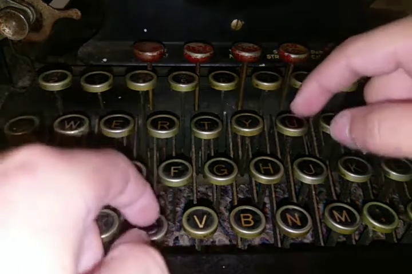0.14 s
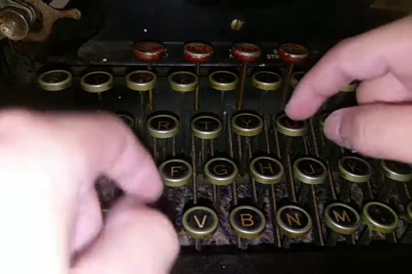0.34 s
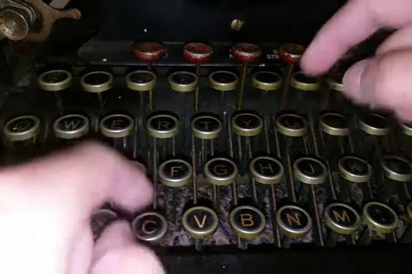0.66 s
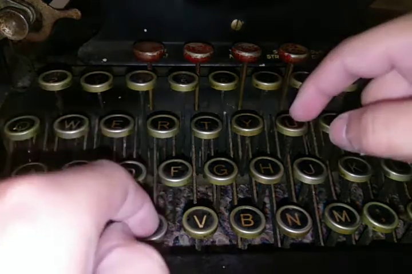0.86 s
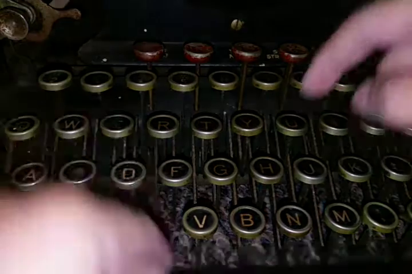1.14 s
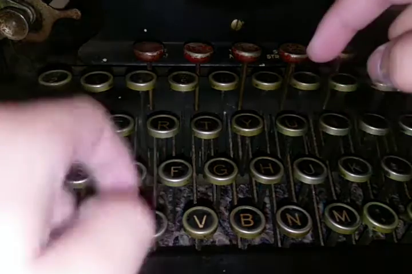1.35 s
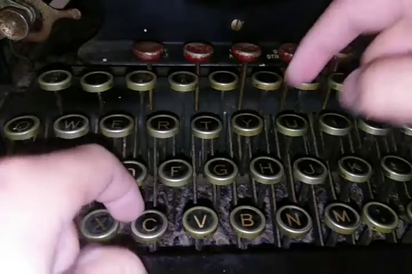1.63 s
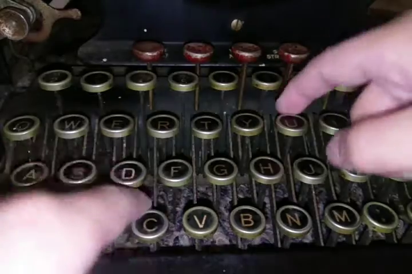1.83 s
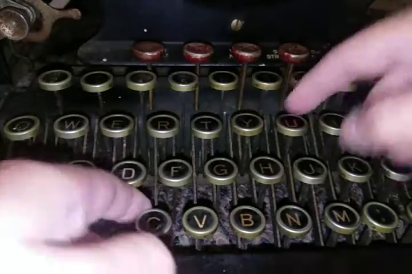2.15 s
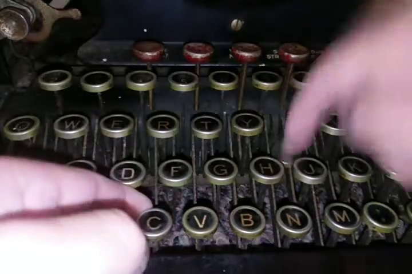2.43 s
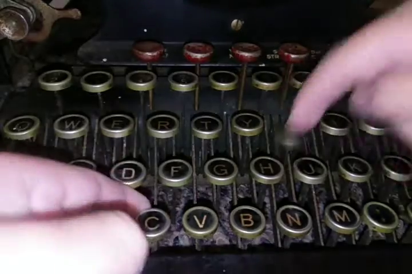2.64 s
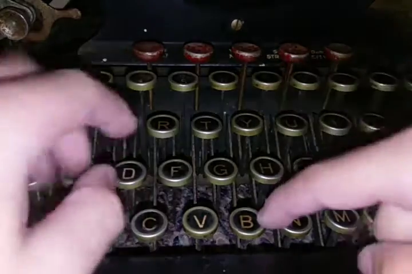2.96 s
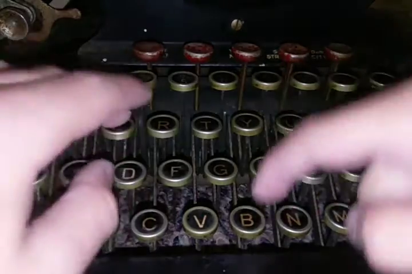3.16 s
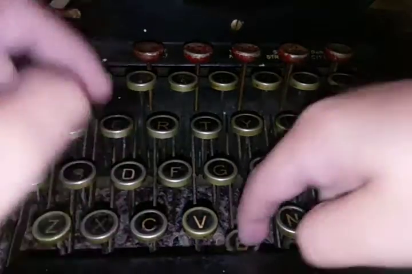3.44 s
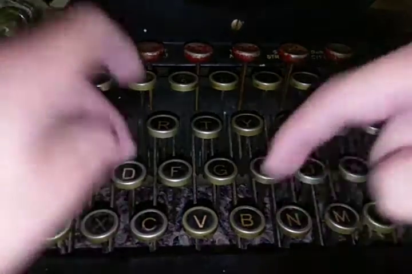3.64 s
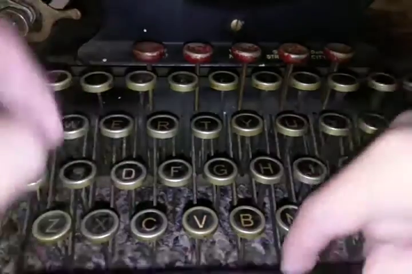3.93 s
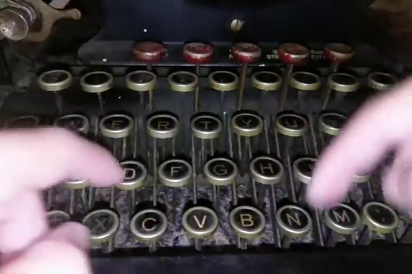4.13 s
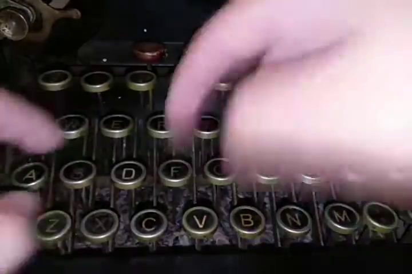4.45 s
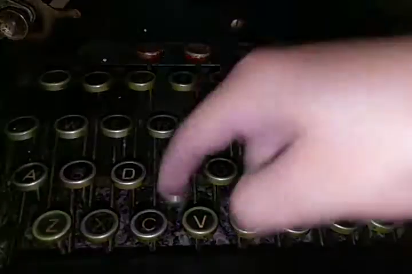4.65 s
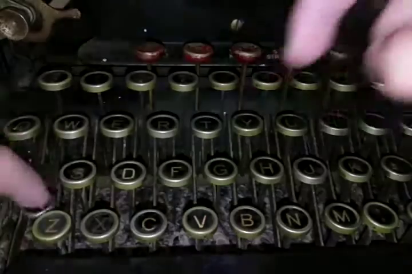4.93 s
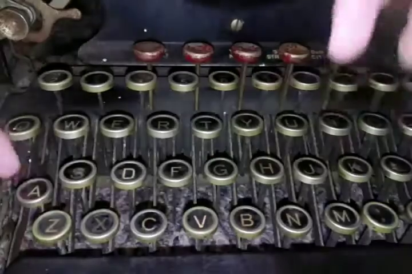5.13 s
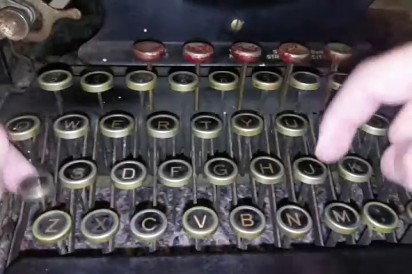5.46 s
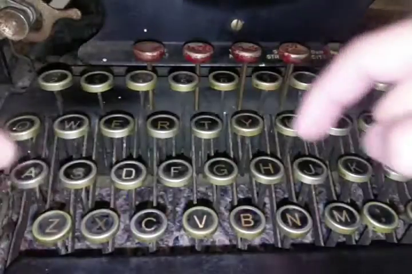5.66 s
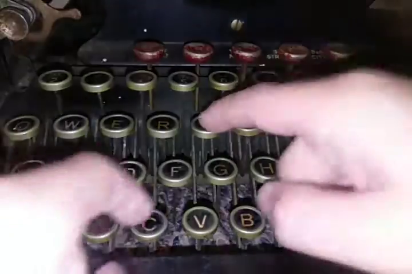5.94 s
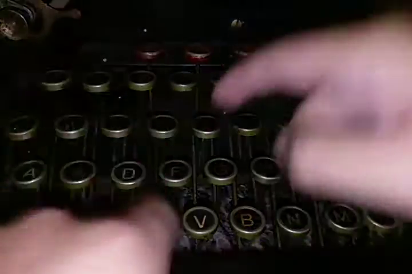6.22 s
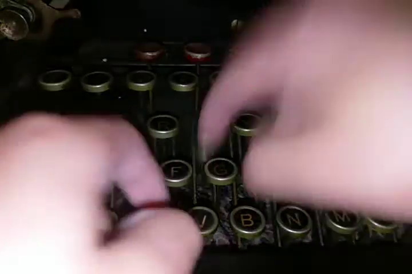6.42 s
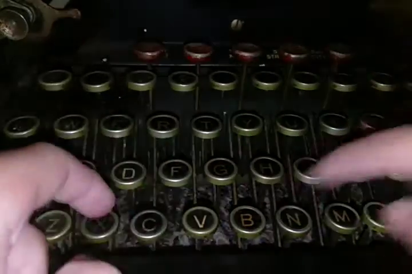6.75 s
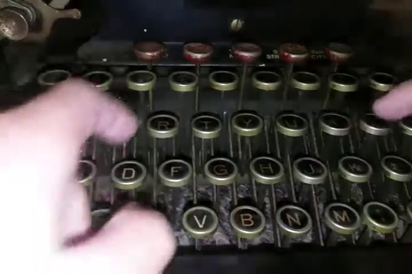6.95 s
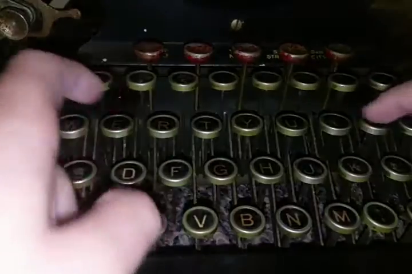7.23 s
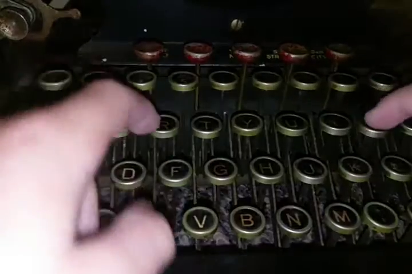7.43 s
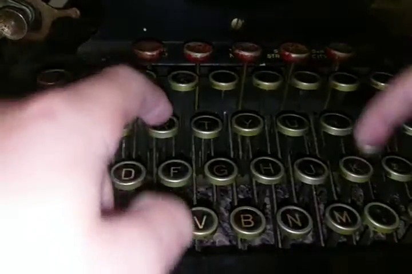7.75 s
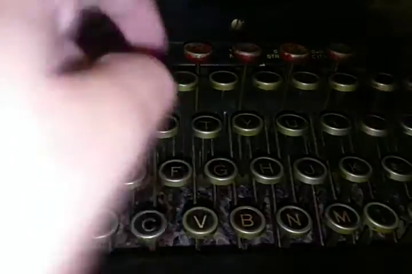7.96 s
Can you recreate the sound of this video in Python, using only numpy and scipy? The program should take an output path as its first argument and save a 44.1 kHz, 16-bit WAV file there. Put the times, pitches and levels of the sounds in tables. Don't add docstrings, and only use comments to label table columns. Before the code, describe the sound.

Old manual typewriter keys clack sharply one at a time, close up, in irregular clusters with rattling links, desk thuds and quiet pauses.

```python
import sys
import numpy as np
from scipy import signal
from scipy.fft import rfft, irfft, next_fast_len
from scipy.io import wavfile
from scipy.ndimage import map_coordinates

SR = 44100
rng = np.random.default_rng(int(sys.argv[2]) if len(sys.argv) > 2 else 0)


def pcm_store(signal):
    levels = np.round(np.clip(np.atleast_2d(signal), -1, 1) * 32767)
    wavfile.write(sys.argv[1], SR, levels.astype(np.int16).T)


def gain_from_db(level_db):
    decades = np.asarray(level_db, float) / 20
    return 10 ** decades


N = 356636

# time in seconds, bar level in dB, slug and frame in dB re bar, ceiling slap in dB.
STRIKES = [(1.0882, -11.5, 4.5, -14, -10), (2.3988, -10.5, 2, -9.5, -7), (3.2776, -12.5, 5, -10.5, -6),
           (3.5192, -10, 1.5, -15.5, -9), (3.7436, -28, 8.5, -10, -6), (4.4648, -9, 3, -13, -8.5),
           (4.8557, -8, -3.5, -15.5, -14), (6.1712, -10, 2.5, -9.5, -8), (6.382, -9, 0.5, -14, -13),
           (7.6091, -10, 0, -16, -14), (7.9866, -5, -4, -16.5, -13.5)]
# time in seconds, steel in dB, frame and case in dB re steel,
# rattle damping in dB per 10 ms.
PRESSES = [(1.052, -35.5, -6, -21, 13), (2.367, -29.5, -4.5, -20.5, 14), (3.2405, -26, -6, -23.5, 18),
           (3.473, -32, -8, -33, 11), (3.718, -35, -12.5, -21, 21), (4.432, -28.5, -8.5, -21, 16),
           (4.811, -34, -12, -36, 16), (5.41, -52, -4, -17, 14), (5.428, -29.5, -9, -21, 26),
           (6.132, -29, -9, -30, 18), (6.333, -41, -10, -20, 13), (6.337, -29.5, -11.5, -26, 16),
           (7.56, -27, -11, -28.5, 21), (7.9503, -27, -9.5, -26.5, 19)]
# time in seconds, steel in dB, frame in dB re steel.
SWINGS = [(1.062, -45, -5), (3.496, -30.5, -4), (3.729, -39, -7), (4.445, -36.5, -8.5), (4.825, -47.5, -8),
          (6.344, -40, -7), (6.36, -43, -12), (7.578, -46, -7), (7.965, -42, -8)]
# time in seconds, steel in dB, frame and sizzle in dB re steel.
TRIPS = [(1.079, -29, -2.5, -7.5), (2.392, -29.5, -0.5, -10), (3.268, -31, -3.5, -5),
         (3.51, -28.5, -5.5, -5), (4.458, -33, 1, -3), (4.845, -37.5, -2.5, -5), (6.1615, -31, -4, -7),
         (6.373, -31.5, -6, -3), (7.5975, -30.5, -3, -8), (7.978, -29.5, -4, -14)]
# time in seconds, steel in dB, frame in dB re steel.
JOLTS = [
    (3.7427, -22, -10),
    (3.7505, -29, -6.5),
    (3.753, -31, -13.5),
    (3.781, -42.5, -26),
    (3.789, -42, -22),
]
# time in seconds, steel in dB, frame and case in dB re steel.
FALLS = [(1.175, -33, -3, -21), (2.534, -47.5, 1.5, -16), (2.549, -34, -1, -21.5), (3.419, -38, 0, -23),
         (3.438, -41, -2.5, -13), (3.623, -40, 2, -14.5), (3.643, -54.5, 9.5, -4), (3.913, -48, -6, -22),
         (3.9165, -35, 0, -21.5), (4.6, -38, 1.5, -15), (4.977, -37.5, 0.5, -17), (6.277, -37, 0.5, -17),
         (6.505, -39, 2, -18), (6.517, -44, 2, -9.5), (7.711, -39.5, 2, -13.5)]
# time in seconds, steel in dB, frame and sizzle in dB re steel,
# rattle damping in dB per 10 ms.
RELEASES = [(1.155, -26.5, -11.5, -6.5, 11.5), (1.195, -46, -17, -9.5, 8), (1.228, -37, -6.5, -2.5, 12.8),
            (2.6, -28.5, -4, -2.5, 17.1), (2.655, -58, -12, 4, 8.5), (3.956, -30.5, -15, -14.5, 14.7),
            (3.979, -43, -20.5, -9, 15.8), (4.586, -34, -9.5, -9, 10.4), (4.67, -35, -10.5, -8.5, 13.4),
            (5.016, -56.5, -20, -15, 14), (5.891, -70, -18, -13.5, 3.2), (6.494, -49, -5.5, -24, 14),
            (6.579, -42, -5, -6, 12), (6.583, -28.5, -8, -6.5, 20.7), (7.769, -39, -9, -13.5, 9.85),
            (7.777, -34.5, -15, -7, 14.4), (8.076, -33, -5.5, -15.5, 12.8)]
# time in seconds, steel in dB, frame and case in dB re steel.
NUDGES = [(0.79, -73.5, 2, 7), (2.858, -61.5, -3, -25.5), (3.036, -54, -6, -19.5), (3.056, -58, -12, -14.5),
          (5.189, -66, -10, -14.5), (5.242, -71, 2, -6), (5.27, -77, 3, 3), (7.285, -54, -16, -25),
          (7.297, -64.5, 2, -9), (7.414, -61.5, -4, -20)]
# start in seconds, length in seconds, sizzle in dB, steel in dB re sizzle.
DRAGS = [(2.56, .042, -58, 1), (2.62, .04, -63, -3), (2.874, .008, -66, 2), (3.255, .015, -48, 0),
         (3.425, .02, -53, -3), (3.65, .065, -61, -3), (3.72, .024, -46, 5), (4.44, .02, -45, -4),
         (4.63, .042, -61, 4), (5.435, .02, -60, -3), (5.89, .1, -90, 8), (6.53, .055, -60, 5),
         (6.615, .05, -67, -3), (7.74, .03, -64, 0)]
# time in seconds, level in dB.
THUMPS = [(1.22, -58), (2.57, -57), (2.59, -58), (3.395, -64), (3.43, -56), (3.64, -53), (3.757, -44),
          (3.89, -68), (4.58, -61), (4.62, -56), (4.662, -59), (4.988, -54), (5.025, -58), (5.427, -64),
          (6.33, -56), (6.525, -56), (6.61, -65), (7.55, -67)]

# centre in Hz, width in Hz, level in dB.
BAR_MODES = [(3880, 900, -7.5), (5200, 750, 0), (5950, 700, -2)]
SLUG_MODES = [(6771, 630, 1), (8066, 1100, 2), (9360, 3100, -8.5)]
FRAME_MODES = [(1011.6, 250, -7.5), (1547, 370, -4.5), (2200, 640, -1.5), (3375, 1300, -5.5)]
SIZZLE_MODES = [(10050, 2600, 1), (14000, 4000, -3)]
CASE_MODES = [(220.01, 20, 1), (326, 50, -0.5), (392.3, 52, -1.5), (620, 220, -3)]
# centre in Hz, width in Hz, level in dB.
RING_MODES = [(2265, 40, -11.5), (4860, 30, -4), (5396, 25, -1), (5902, 25, -5.5), (7025, 6, 0.5),
              (7060, 14, -3), (7630, 26, -1.5), (7730, 22, 0), (8050, 30, -2.5), (6845, 22, 0),
              (7420, 27, -3), (11400, 120, -16)]
# centre in Hz, width in Hz, level in dB.
SLAP_MODES = [(5250, 2000, -7.5), (7800, 5200, 0)]
# delay in seconds, level in dB.
WALLS = [(.0043, -13.5), (0.011, -17.5), (.0135, -15), (.023, -18), (.03, -22)]
# t60 in seconds, level in dB.
DIFFUSE = [(0.36, -8), (.29, -7), (0.26, -6), (0.11, -5.5), (0.22, -4.5)]
# centre in Hz, width in Hz, level in dB.
COMB_MODES = [(1010, 100, -8), (1500, 80, -6), (2250, 130, 0), (3010, 210, -8), (3970, 120, -9)]

# centre in Hz, width in Hz, level in dB.
CREEP_MODES = [(619, 70, -1), (1520, 80, -9), (2160, 160, -9), (3140, 70, 5), (4860, 120, -7),
               (5470, 220, -8), (5910, 180, -6)]
EASE_MODES = [(603, 90, 0), (1000, 200, -7), (1770, 160, -5), (3190, 200, -6), (5120, 150, -8),
              (5700, 300, -6), (6300, 300, -9)]
# time in seconds, level in dB.
CREEP_LEVEL = [(5.18, -76), (5.25, -73), (5.3, -76), (5.35, -75), (5.4, -80)]
EASE_LEVEL = [(5.47, -72), (5.53, -74), (5.6, -70), (5.68, -74), (5.76, -80)]
# pitch in Hz, level in dB, start in seconds, t60 in seconds.
SPRING_PINGS = [(4830, -61, 5.19, .045), (6550, -68, 5.19, .04), (5950, -64, 5.242, .045),
                (5600, -72, 5.27, .04)]
# centre in Hz, width in Hz, level in dB.
CARRIAGE_MODES = [(650, 500, -3), (1300, 600, -7), (1840, 200, -4.5), (2600, 400, -7), (3130, 320, -3.5),
                  (3900, 290, -7), (5000, 350, 0.5), (5800, 400, -2.5), (6330, 350, -0.5)]
# time in seconds, level in dB.
SLIDE_LEVEL = [(0, -64), (.11, -65), (.19, -72), (.24, -82.5)]

# centre in Hz, width in Hz, level in dB.
DESK_MODES = [(53, 9.3, 4.5), (92, 40, 1), (113.8, 50, 0), (134, 22, -16.5)]
# time in seconds, peak in dB, t60 in seconds.
THUDS = [(1.072, -45, 0.95), (1.205, -42.5, .55), (2.394, -46, 0.56), (2.575, -43, 0.714),
         (3.27, -48, 0.69), (3.44, -45, 1), (3.655, -44, .35), (3.772, -44, 0.35), (3.944, -45.5, 0.565),
         (4.46, -46, 1), (4.63, -46, 0.306), (4.832, -47.5, 0.42), (5.0, -44, .45), (5.46, -54, 0.193),
         (6.165, -44, .6), (6.302, -47, .8), (6.534, -42.5, 0.413), (7.574, -47.5, 0.79),
         (7.745, -44, 0.44), (7.972, -48, 0.75)]
# closest pass in seconds, peak in dB, seconds to swell 20 dB, seconds to fade 20 dB.
BRUSHES = [(.8, -78, 0.07, 0.31), (.9, -72, 0.1855, 0.14), (1.03, -70.5, 0.04, 0.17),
           (1.52, -65, 0.1437, 0.1161), (1.63, -63.5, 0.21, 0.2155), (1.91, -76, 0.16, 0.29),
           (2.03, -76, 0.13, 0.07), (2.14, -73, 0.1, 0.16), (2.856, -64, 0.0062, .05),
           (3.058, -66.5, 0.04, 0.14), (4.12, -82, .1, 0.27), (4.42, -75, 0.03, 0.07),
           (5.192, -67.5, 0.005, 0.0055), (5.24, -77, 0.12, 0.28), (5.57, -75, 0.13, .3),
           (5.78, -73, 0.39, .25), (5.93, -72, .05, .12), (6.09, -72, 0.09, 0.36), (6.8, -65.5, 0.3, 0.28),
           (7.0, -72, 0.48, 0.1), (7.22, -68, 0.46, 0.07), (7.416, -68, 0.05, 0.1), (7.54, -69, 0.06, 0.58)]
# frequency in Hz, density in dB per Hz.
SKIN_SPECTRUM = [(240, -34.5), (400, 0), (487, -13.5), (542, -2.5), (949, -5), (1390, -6), (7240, -3.5),
                 (15000, -22)]
# frequency in Hz, density in dB per Hz.
HUSH_SPECTRUM = [(20, -42), (40, -6.5), (58, 0.5), (85, -10.5), (145, -9.5), (180, -19), (290, -18.5),
                 (450, -27), (1000, -29.5), (2000, -34.5), (7000, -39.5), (15400, -44.5)]

CONTACT_S = np.arange(SR // 16) / SR


def unit(x):
    return x / np.sqrt(np.mean(x ** 2) + 1e-20)


def along(points, hz):
    f, v = np.transpose(points)
    return np.interp(np.log(hz + 1), np.log(f + 1), v)


def filtered(x, response):
    m = next_fast_len(N + SR // 2)
    return irfft(rfft(x, m) * response(np.fft.rfftfreq(m, 1 / SR)), m)[..., :N]


def resonant(x, modes, low_hz, high_hz):
    def response(f):
        peaks = 0
        for k, (hz, width_hz, db) in enumerate(modes):
            damping = 1j * f * width_hz
            peaks = peaks + (-1) ** k * gain_from_db(db) * damping / (hz * hz - f * f + damping)
        gain = peaks * (1j * f / (low_hz + 1j * f)) ** 2 / (1 + 1j * f / high_hz) ** 2
        return gain / np.sqrt(np.mean(np.abs(gain) ** 2))
    return filtered(x, response)


def wobble(rate_hz, size):
    knots = rng.standard_normal(int(size * rate_hz / SR) + 4)
    return map_coordinates(knots, [np.arange(size) * rate_hz / SR])


def level(points):
    rows = [(points[0][0] - .03, -100), *points, (points[-1][0] + .03, -100)]
    return gain_from_db(np.interp(np.arange(N) / SR, *np.transpose(rows)))


def slowly(shape):
    t = np.arange(0, N / SR + .002, .001)
    return np.interp(np.arange(N) / SR, t, shape(t))


def add(forces, s, shape, bar_db, parts_db, grain_db, edge):
    grit = unit(gain_from_db(grain_db * wobble(1500, size=len(shape))) * rng.standard_normal((5, len(shape))))
    grit[:, 0] = edge
    force = shape * grit
    force *= np.linalg.norm(shape) / np.linalg.norm(force, axis=1, keepdims=True)
    gain = gain_from_db(bar_db + np.array([0, *parts_db]))[:, None]
    forces[:, round(s * SR):][:, :len(shape)] += gain * force


def strikes(forces, slaps):
    t, ceiling_delay_s = CONTACT_S, .0158
    crack = gain_from_db(-60 * (t / 0.002995) ** 2) + gain_from_db(-9.5 - 60 * t / 0.035)
    answer = gain_from_db(-60 * (t / .002) ** 2) + gain_from_db(-22 - 60 * t / .015)
    for s, db, slug, frame, slap_db in STRIKES:
        add(forces, s + 0.00016, crack, db + 3, (slug, frame, -22.5, frame - 21), grain_db=2.0, edge=3.5)
        slap = (db > -18) * answer + 1e-9
        slap_parts_db = (slug + 7, -40, -40, -40)
        add(slaps, s + ceiling_delay_s, slap, db - 2.5 + slap_db, slap_parts_db, grain_db=.1, edge=6)


def links():
    rows = [(s, db, frame, -9, -24, 5.5) for s, db, frame in SWINGS]
    rows += [(s, db, frame, sizzle, -25, 4.5) for s, db, frame, sizzle in TRIPS]
    rows += [(s, db, frame, -8, -21, 9) for s, db, frame in JOLTS]
    rows += [(s, db, frame, -7.5, case, damping) for s, db, frame, case, damping in PRESSES]
    rows += [(s, db, frame, sizzle, -27, damping) for s, db, frame, sizzle, damping in RELEASES]
    rows += [(s, db, frame - 2.5, -8, case, 12.93) for s, db, frame, case in FALLS]
    rows += [(s, db, frame - 2.5, -8, case, 16.8) for s, db, frame, case in NUDGES]
    return rows


def rattles(forces):
    t = CONTACT_S
    for s, db, frame, sizzle, case, damping_db in links():
        rattle = (1 - np.exp(-t / 0.0015)) * gain_from_db(-damping_db * t * 94.8 - 60 * (t / 0.043) ** 4)
        parts_db = (1.5, frame + 5, sizzle + 4, case + 9)
        add(forces, s, rattle, db - 1.5, parts_db, grain_db=3.5, edge=0)


def drags(forces):
    for s, length_s, db, steel in DRAGS:
        stroke = np.sqrt(np.sin(np.linspace(0, np.pi, round(length_s * SR))))
        add(forces, s, stroke, db + steel, (2.5, -7, -steel, -22), grain_db=2.5, edge=0)


def thumps(forces):
    push = (1 - np.exp(-CONTACT_S / .002)) * gain_from_db(-60 * CONTACT_S / .035)
    for s, db in THUMPS:
        add(forces, s, push, db - 40, (0, 15, 0, 41), grain_db=1.5, edge=0)


def contacts():
    forces, slaps = np.zeros((5, N + SR)), np.zeros((5, N + SR))
    strikes(forces, slaps)
    rattles(forces)
    drags(forces)
    thumps(forces)
    return forces[:, :N], slaps[:, :N]


def parts(forces):
    bar, slug, frame, sizzle, case = forces
    return (resonant(bar, BAR_MODES, 3500, 8000) + resonant(slug, SLUG_MODES, 5500, 9500)
            + resonant(frame, FRAME_MODES, 700, 4500) + resonant(sizzle, SIZZLE_MODES, 8000, 16000)
            + resonant(case, CASE_MODES, 120, 1500))


def comb():
    knocks, t = np.zeros(N + SR), np.arange(SR // 200) / SR
    for s, db, frame, case in FALLS:
        burst = gain_from_db(-60 * t / .002) * rng.standard_normal(len(t))
        burst /= np.linalg.norm(burst)
        knocks[round((s + .0012) * SR):][:len(t)] += gain_from_db(db + frame + 15.5) * burst
    return resonant(knocks[:N], COMB_MODES, 600, 6000)


def creaking():
    def grain():
        return gain_from_db(4 * wobble(90, size=N) + 2 * wobble(700, size=N)) * rng.standard_normal(N)
    squeak = level(CREEP_LEVEL) * unit(resonant(grain(), CREEP_MODES, 300, 9000))
    groan = level(EASE_LEVEL) * unit(resonant(grain(), EASE_MODES, 300, 9000))
    return squeak + groan


def spring():
    t = np.arange(SR) / SR
    out = np.zeros(N)
    for hz, db, s, t60 in SPRING_PINGS:
        waver = 1 + .3 * wobble(60, size=SR)
        phase = 2 * np.pi * np.cumsum(hz + 85 * wobble(450, size=SR)) / SR
        out[round(s * SR):][:SR] += waver * gain_from_db(db - 60 * t / t60) * np.sin(phase)
    return out


def carriage():
    return level(SLIDE_LEVEL) * unit(resonant(rng.standard_normal(N), CARRIAGE_MODES, 300, 9000))


def desk():
    rise_db_per_s, idle_db, thud_life_s = 650, -76, 0.28

    def push(life):
        def thuds(t):
            total = 0
            for s, db, t60 in THUDS:
                fall_db = 60 * (t - s) / (life * t60) + 20 * ((t - s) / (life * thud_life_s)) ** 4
                total = total + gain_from_db(db - np.where(t < s, rise_db_per_s * (s - t), fall_db))
            return total
        return gain_from_db(idle_db) + slowly(thuds)

    shake = rng.standard_normal(N)
    lowest = unit(resonant(shake, DESK_MODES[:1], 23, 300))
    upper = unit(resonant(shake, DESK_MODES[1:], 60, 300))
    return gain_from_db(-1) * push(1) * lowest + gain_from_db(-3) * push(.55) * upper


def hands():
    roundness = 1.5

    def nearness(t):
        power = 0
        for s, db, swell_s, fade_s in BRUSHES:
            away = np.abs(t - s) / np.where(t < s, swell_s, fade_s)
            power = power + gain_from_db(2 * db - 40 * away ** roundness)
        return np.sqrt(power)

    grains = gain_from_db(1.2 * wobble(25, size=N) + 1.8 * wobble(600, size=N)) * rng.standard_normal(N)
    return slowly(nearness) * unit(filtered(grains, lambda hz: gain_from_db(along(SKIN_SPECTRUM, hz))))


def walls(forces):
    echoes = np.zeros((5, N))
    for delay_s, db in WALLS:
        echoes += gain_from_db(db) * np.pad(forces, ((0, 0), (round(delay_s * SR), 0)))[:, :N]
    return gain_from_db([[-2], [0], [-5], [-7], [-3]]) * echoes


def diffuse(forces):
    t = np.arange(SR // 2) / SR
    t60, db = np.transpose(DIFFUSE)[:, :, None]
    decay = (1 - np.exp(-(t / 0.0064) ** 2)) * gain_from_db(-120 * t / t60)
    decay = gain_from_db(2 * db) * decay / decay.sum(axis=1, keepdims=True)
    power = signal.fftconvolve(forces ** 2, decay, axes=1)[:, :N]
    echoes = unit(gain_from_db(2.2 * wobble(1200, size=N)) * rng.standard_normal((5, N)))
    return np.sqrt(np.abs(power)) * echoes


def hush():
    noise = unit(filtered(rng.standard_normal(N), lambda hz: gain_from_db(along(HUSH_SPECTRUM, hz))))
    hum_phase = 2 * np.pi * np.cumsum(57 + 3 * wobble(6, size=N)) / SR
    hum = gain_from_db(-64 + 2.2 * wobble(7, size=N)) * np.sin(hum_phase)
    return gain_from_db(-65 + 1.1 * wobble(3.2, size=N)) * noise + hum


def scene():
    forces, slaps = contacts()
    machine = parts(forces + walls(forces) + diffuse(forces))
    ring = gain_from_db(-11.5) * resonant(forces[0] + forces[1], RING_MODES, 1600, 12000)
    ceiling = resonant(parts(slaps), SLAP_MODES, 2500, 11000)
    mechanism = machine + ring + ceiling + comb() + creaking() + spring() + carriage()
    return (mechanism + desk() + hands() + hush())[None]


def roll_off(x):
    return signal.sosfilt(signal.butter(12, 16450, fs=SR, output="sos"), x)


def record(dry):
    top_hz, ceiling_level = 15450, .95
    heard = filtered(dry, lambda hz: (1j * hz / (33 + 1j * hz)) ** 3)
    overloaded = heard / (1 + np.abs(heard / ceiling_level) ** 6) ** (1 / 6)
    dulled = filtered(overloaded, lambda hz: gain_from_db(-32 * np.clip((hz - top_hz) / 250, 0, 1)))
    return roll_off(np.clip(dulled, -1, 1))


dry = scene()
out = record(dry)
pcm_store(out)
```